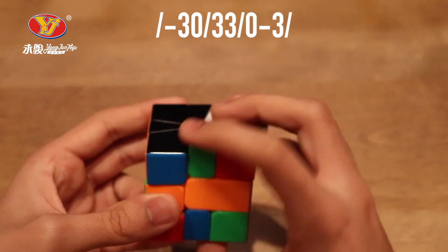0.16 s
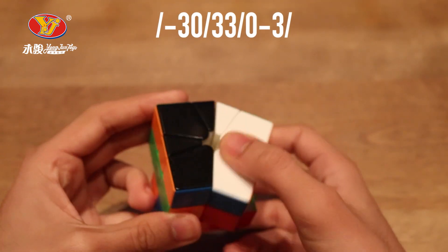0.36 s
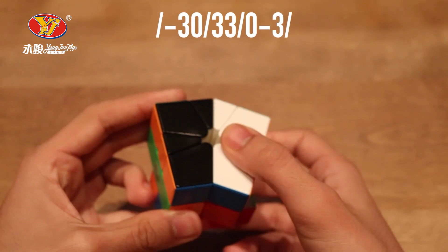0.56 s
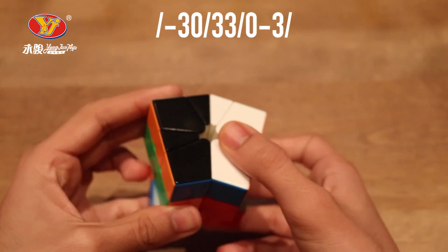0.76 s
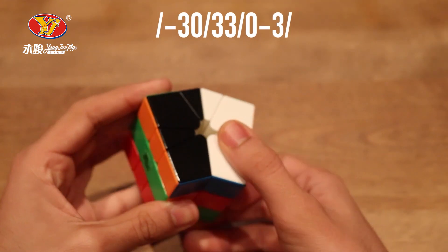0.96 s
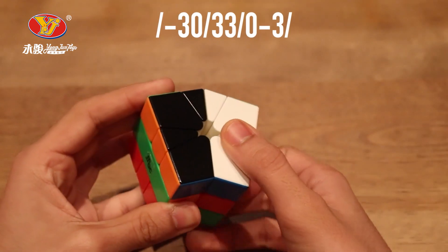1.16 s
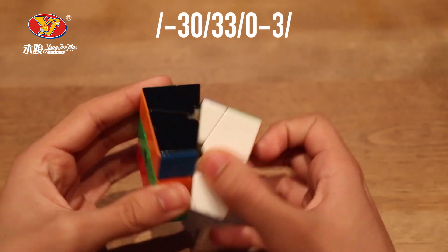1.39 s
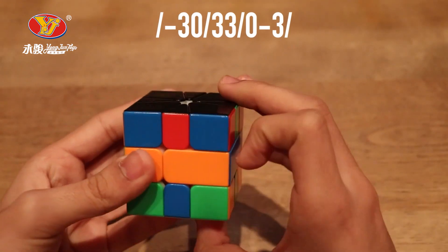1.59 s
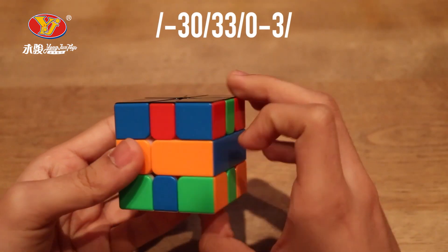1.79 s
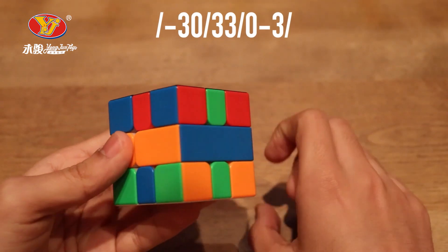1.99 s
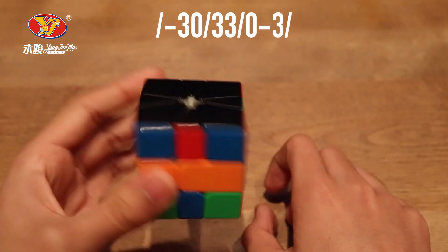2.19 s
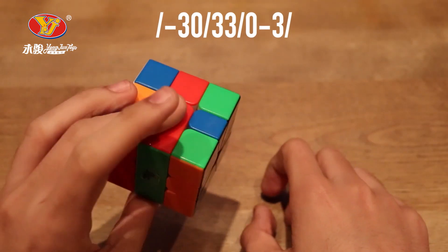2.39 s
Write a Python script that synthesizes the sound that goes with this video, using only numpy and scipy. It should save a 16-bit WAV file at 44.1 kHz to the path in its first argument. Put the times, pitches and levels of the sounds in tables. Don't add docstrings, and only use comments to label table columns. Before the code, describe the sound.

Hard plastic clacks and rattling slides of a hand-turned puzzle cube in a quiet room

```python
import sys
import numpy as np
from scipy import signal
from scipy.fft import rfft, irfft
from scipy.io import wavfile
from scipy.ndimage import uniform_filter1d

SR = 44100
rng = np.random.default_rng(int(sys.argv[2]) if len(sys.argv) > 2 else 0)


def nominal_scale(level):
    x = np.asarray(level, float) / 20
    return 10 ** x


def output_pcm(signal):
    pcm = np.clip(np.atleast_2d(signal).T, -1, 1) * 32767
    wavfile.write(sys.argv[1], SR, np.round(pcm).astype(np.int16))


N = 108045


def evened(x):
    return x / np.sqrt(np.mean(x ** 2) + 1e-20)


def read(points, hz):
    f, value = np.transpose(points)
    return np.interp(np.log(hz + 1), np.log(f + 1), value)


def envelope(points, t):
    return nominal_scale(np.interp(t, *np.transpose(points), left=-120, right=-120))


def add(mix, s, sound):
    part = mix[round(s * SR):][:len(sound)]
    part += sound[:len(part)]


def high_pass(x, hz, order):
    return signal.sosfilt(signal.butter(order, hz, "high", fs=SR, output="sos"), x)


def ring(modes, luck, length=0.054):
    detune, scatter_db, rise_cycles = 0.02, 1.5, 0.5
    t = np.arange(0, length, 1 / SR)
    hz, db, t60 = np.transpose(modes)[:, :, None]
    weight_luck = luck[:len(modes), None]
    pitch_luck = luck[::-1][:len(modes), None]
    rise = 1 - np.exp(-t * hz / rise_cycles)
    decay = nominal_scale(db + scatter_db * weight_luck - 60 * t / t60)
    tone = np.sin(2 * np.pi * hz * (1 + detune * pitch_luck) * t)
    return (rise * decay * tone).sum(0)


# (frequency [Hz], density [dB per Hz])
HISS_SPECTRUM = [(15, -26), (26, 9), (54, -4), (152, -5.5), (188, -8), (454, -9.5), (506, -12), (818, -15),
                 (15500, -24)]


def background():
    hiss_db, hum_db, hum_hz, hum_width_hz = -52, -65, 521, 3.4
    hz = np.fft.rfftfreq(N, 1 / SR)
    hiss, hum = rfft(rng.standard_normal((2, N)))
    colour = nominal_scale(read(HISS_SPECTRUM, hz)) * hz ** 2 / (hz ** 2 + 25 ** 2)
    resonance = 1 / (1 + 2j * (hz - hum_hz) / hum_width_hz)
    return nominal_scale(hiss_db) * evened(irfft(hiss * colour, N)) + nominal_scale(hum_db) * evened(irfft(hum * resonance, N))


# (time [s], level [dB])
STAND_SWAY = [(0, -48), (.25, -60), (1.0, -57.5), (1.15, -50), (1.38, -52), (1.6, -68), (2.2, -61),
              (2.42, -54)]


def sway():
    rate_hz, wander = 15, 0.12
    t = np.arange(N) / SR
    drift = evened(sum(np.sin(2 * np.pi * (f * t + rng.random())) for f in (.4, .9, 1.7)))
    phase = 2 * np.pi * rate_hz * np.cumsum(1 + wander * drift) / SR
    return np.sqrt(2) * nominal_scale(np.interp(t, *np.transpose(STAND_SWAY))) * np.sin(phase)


# (frequency [Hz], level [dB], t60 [s])
TABLE_MODES = [(34, 5, 0.15), (52.3, -6, 0.28), (75, 3, 0.12), (109, 13.5, 0.058), (154, 12.5, 0.052),
               (237.2, 9, 0.11), (339.6, 5, 0.119), (526, 10.5, 0.04), (750, 3, 0.048), (1011, 8, 0.044)]
# (time [s], level [dB], direction [signed], hardness [dB per octave], struck spot pitch [Hz])
TABLE_BUMPS = [
    (0.6106, -24.5, -1.14, -5.5, 104),
    (0.63, -25.5, 0.27, -7, 42),
    (0.647, -37, 1, -6, 140),
    (0.671, -37.5, 1, -8, 75),
    (2.057, -24, 0.91, -2.5, 104),
    (2.076, -47, -0.44, -4, 75),
    (2.116, -41.5, 1, -2, 120),
    (2.186, -31, 0.95, -20, 247),
    (2.224, -38, -0.98, 1, 372),
]


def bumps():
    push_s = 0.00094
    out, push = np.zeros(N), np.hanning(round(push_s * SR))
    for s, db, way, hard_db, spot_hz in TABLE_BUMPS:
        modes = []
        for hz, mode_db, t60 in TABLE_MODES + [(spot_hz, 9, .05)]:
            octaves_above = max(np.log2(hz / spot_hz), 0)
            modes.append((hz, mode_db + hard_db * octaves_above, t60))
        luck = .5 * np.clip(rng.standard_normal(20), -2, 2)
        sound = np.convolve(push, ring(modes, luck, length=.35))
        add(out, s, way * nominal_scale(db) * sound / abs(sound).max())
    return out


# (frequency [Hz], level [dB], t60 [s])
SHELL_MODES = [(900, -28, 0.029), (1200, -3.5, 0.0054), (1720, -8.5, 0.031), (2418, -3.5, 0.017),
               (2956, -6.5, 0.014)]
CAP_MODES = [(3510, -5.5, 0.023), (3886, -3.5, 0.023), (4460, 3, 0.012), (5350, 0, 0.0068)]
EDGE_MODES = [(5950, -5, 0.011), (7300, 4.5, 0.011), (8030, 6, 0.0084), (9000, -2, 0.0061),
              (10130, 4, 0.0046), (11370, 1, 0.0058), (12920, -2.5, 0.0063)]
# (time [s], level [dB])
SLIDE_FORCES = [
    [(.15, -60), (.224, -68), (.236, -49), (.3, -50.5), (.36, -51), (.5, -67.5)],
    [(.79, -62), (.83, -60.5), (1.0, -69.5), (1.022, -48.5), (1.05, -67)],
    [(1.36, -67), (1.42, -57), (1.54, -51), (1.68, -66.5)],
]
SLIDE_LEVELS = (0, 1, -6)


def slides():
    slips_per_s, spread_db, pieces = 2300, 3.5, 10
    t = np.arange(N) / SR
    force = sum(envelope(contour, t) for contour in SLIDE_FORCES)
    size = nominal_scale(spread_db * np.minimum(rng.exponential(1, N), 5))
    sign = np.sign(rng.random(N) - .5)
    slips = size * sign * (rng.random(N) < slips_per_s / SR)
    piece = rng.integers(0, pieces, N)
    luck = 2 * rng.standard_normal((pieces, 12))
    rubbing = np.zeros(N)
    for modes, db in zip((SHELL_MODES, CAP_MODES, EDGE_MODES), SLIDE_LEVELS):
        rung = sum(signal.oaconvolve(slips * (piece == k), ring(modes, row))[:N]
                   for k, row in enumerate(luck))
        rubbing += nominal_scale(db) * evened(rung)
    return force * rubbing


# (time [s], shell pitch [Hz], shell level [dB], cap level [dB], edge level [dB])
HALF_TURN = [(0.157, 2460, -46, -50, -48), (0.1705, 1830, -34, -55, -60), (0.209, 1680, -54, -36, -34.5),
             (0.2263, 1800, -17, -22, -21), (0.2293, 1820, -11, -18, -18), (0.2311, 3140, -24, -5.5, -11),
             (0.2325, 2780, -20, 0, -10.5), (0.2354, 1900, -22, -22, -28), (0.2378, 1800, -18, -32, -13),
             (0.2427, 2370, -22, -22, -40), (0.248, 2600, -27, -28, -36), (0.2553, 2530, -31, -36, -51),
             (0.2642, 2440, -31, -22, -31), (0.2736, 2300, -23, -20, -37), (0.2784, 2360, -45, -31, -52),
             (0.283, 2200, -33, -45, -50), (0.2884, 1900, -22, -30, -32), (0.2947, 1880, -18, -39, -41),
             (0.2977, 1900, -19.5, -23.5, -31), (0.322, 2500, -57, -44, -52),
             (0.3427, 1550, -26.5, -29, -30), (0.3451, 1580, -22, -24.5, -37), (0.359, 1560, -53, -37, -58),
             (0.3773, 1750, -34, -44, -45), (0.4182, 1790, -28, -25.5, -39),
             (0.4192, 2670, -24.5, -41, -44)]
NUDGES_AND_TAPS = [(0.7518, 2630, -38, -39, -25.5), (0.808, 1720, -30.5, -45, -43),
                   (0.8195, 1650, -23, -23, -36), (0.8206, 820, -32, -25.5, -22.5),
                   (0.8353, 1100, -38, -48, -50), (0.9018, 2300, -38, -29.5, -40),
                   (0.8317, 2300, -35, -42, -39), (0.867, 1200, -35, -43, -31),
                   (0.8859, 2470, -40, -47, -49), (0.8914, 2250, -29.5, -36, -50),
                   (0.8956, 2460, -39, -35, -33), (0.8991, 1840, -27, -38, -45),
                   (0.966, 1680, -33.5, -33, -52), (1.024, 2520, -45.5, -35, -56),
                   (1.0261, 2400, -38, -33, -50), (2.058, 2430, -37, -60, -61), (2.228, 980, -43, -58, -55)]
TURN_BACK = [(1.3748, 1710, -22.5, -23, -30), (1.3784, 2450, -23, -24.5, -32),
             (1.3957, 1870, -57, -52, -35), (1.4132, 2100, -16, -28, -45), (1.415, 2060, -13, -18, -25),
             (1.416, 1950, -25, -10, -22.5), (1.4222, 1820, -27, -40, -31), (1.428, 2460, -31, -45, -45),
             (1.438, 2430, -18, -20.5, -24.5), (1.44, 2300, -36, -22.5, -31), (1.4443, 2640, -29, -43, -27),
             (1.4493, 2470, -23.5, -19, -27), (1.4518, 2350, -26.5, -36, -38), (1.487, 2010, -25, -28, -47),
             (1.4904, 1980, -9.5, -13.5, -16), (1.4938, 1780, -32, -26, -33), (1.5025, 1910, -35, -42, -56),
             (1.5154, 1900, -51, -50, -56), (1.5294, 2470, -16, -13.5, -23.5),
             (1.5373, 1770, -24, -24, -36), (1.5378, 2040, -27.5, -27, -31), (1.5524, 2100, -30, -44, -45),
             (1.572, 2100, -29.5, -34, -57), (1.6057, 1900, -38, -33, -30.5), (1.605, 2370, -55, -48, -36)]
# (free low body [dB], thin tips [dB])
GRIP_COLOURS = [
    (2.5, -1),
    (5.5, 2),
    (-7, -4),
]
# (time [s], pitch [Hz])
STRUCK_CAP_PITCHES = [(0, 4300), (.231, 4120), (.26, 3260), (.277, 4300), (.33, 3300), (.41, 3360),
                      (.7, 3720), (.815, 3280), (.85, 3880), (.893, 4830), (.96, 4400), (1.0, 4000),
                      (1.3, 4360), (1.41, 4990), (1.43, 4380), (1.448, 3350), (1.48, 3220), (1.52, 3850),
                      (1.533, 3130), (1.55, 4240), (1.6, 5140)]
# (frequency [Hz], level [dB], t60 [s])
SNAPS = [
    (2500, -0.5, 0.0035),
    (3860, 4.5, 0.0017),
    (8400, 4, 0.0011),
]


def knocks(table, body_db, tips_db):
    chatter_s, damped = .00025, .7
    out, t = np.zeros(N), np.arange(150) / SR
    for s, shell_hz, *levels_db in table:
        chatter = rng.standard_normal(len(t)) ** 3 * np.exp(-t / chatter_s)
        chatter[0] = 6
        luck = np.clip(rng.standard_normal((3, 12)), -2, 2)
        cap_hz = [hz for start, hz in STRUCK_CAP_PITCHES if start < s][-1]
        shell = [(hz, db + body_db * (hz < 1500), damped * t60) for hz, db, t60 in SHELL_MODES]
        shell.append((shell_hz, 5, .007))
        cap = [(hz, db, damped * t60) for hz, db, t60 in CAP_MODES]
        cap.append((cap_hz, 10, .0055))
        edge = [(hz, db + tips_db * (hz > 9000), t60) for hz, db, t60 in EDGE_MODES]
        for modes, snap, db, row in zip((shell, cap, edge), SNAPS, levels_db, luck):
            sound = np.convolve(chatter, ring(modes + [snap], row))
            add(out, s - chatter_s, nominal_scale(db) * sound / abs(sound).max())
    return out


def puzzle():
    flurries = zip((HALF_TURN, NUDGES_AND_TAPS, TURN_BACK), GRIP_COLOURS)
    contacts = slides() + sum(knocks(table, *grip) for table, grip in flurries)
    return high_pass(contacts, 644, order=4)


# (frequency [Hz], t60 [s])
ROOM_DECAY = [(500, 0.37), (1500, 0.23), (4000, 0.26), (10000, 0.39)]


def room(x):
    room_db, spacing = -11.5, 20
    taps = np.zeros(SR // 2)
    at = np.arange(120, SR // 2 - spacing, spacing)
    taps[at + rng.integers(0, spacing, len(at))] = rng.choice([-1., 1.], len(at))
    hz, t, z = signal.stft(taps, SR, nperseg=256)
    decay = nominal_scale(-60 * t / read(ROOM_DECAY, hz)[:, None])
    tail = signal.istft(z * decay, SR, nperseg=256)[1]
    return nominal_scale(room_db) * signal.fftconvolve(x, tail / np.linalg.norm(tail))[:N]


def scene():
    direct = puzzle()
    table = high_pass(bumps(), 30, order=2)
    return np.tile(direct + room(direct) + table + sway() + background(), (2, 1))


# (start [s], end [s], level [dB])
WIDE_BURSTS = [
    (0.194, 0.219, -15),
    (1.35, 1.395, -13),
    (1.424, 1.48, -5),
    (1.48, 1.5, -24),
]


def stereo_image(mono):
    edge_hz, patch_hz, hole_limit = 15950, 8800, 1.0
    split_limit, split_db = .6, -3
    side_db, side_hz, mask_db = -14, 1150, 14
    stray_hz, stray_limit = 4000, 1.5
    hz, t, z = signal.stft(mono, SR, nperseg=1024, noverlap=768)
    column = hz[:, None]
    band = (hz // 700).astype(int)
    fine_band = np.minimum(hz // 250, 39).astype(int)

    hole, split, stray = (evened(uniform_filter1d(rng.standard_normal((40, len(t))), size=n))
                          for n in (18, 12, 7))
    high = column > patch_hz
    z = z * (column < edge_hz) * ~(high & (hole[band] > hole_limit))
    level = uniform_filter1d(abs(z), size=5, axis=0)
    usual = np.median(level, axis=1, keepdims=True)
    calm = (level / (usual + 1e-12))[2:120].mean(0) < nominal_scale(mask_db)

    apart = high & (split[band] > split_limit) & (column % 700 < 400)
    strays = (stray[fine_band] > stray_limit) & (column < stray_hz)
    low = (column < side_hz * nominal_scale(2.5 * stray[0])) | strays
    parted = sum(nominal_scale(db) * (t > a) * (t < b) for a, b, db in WIDE_BURSTS) * (column > side_hz)
    patches = nominal_scale(split_db) * apart + nominal_scale(side_db) * low * calm
    side = np.minimum(level, 2 * usual) * patches + level * parted
    side = side * np.exp(2j * np.pi * rng.random(z.shape))
    mid, side = signal.istft(np.array([z, side]), SR, nperseg=1024, noverlap=768)[1][:, :N]
    return np.array([mid + side, mid - side])


def low_pass(x):
    return signal.sosfilt(signal.butter(12, 16810, fs=SR, output="sos"), x)


def record(dry):
    mix = stereo_image(dry[0])
    return low_pass(mix)


dry = scene()
out = record(dry)
output_pcm(out)
```